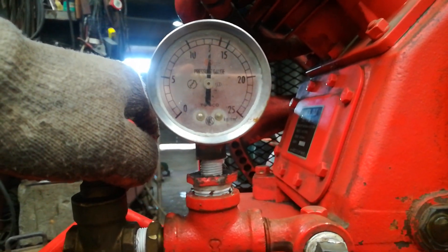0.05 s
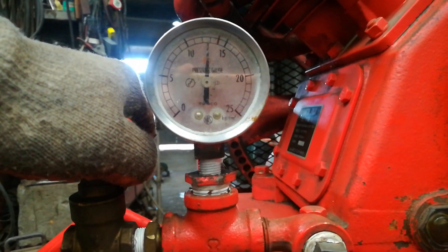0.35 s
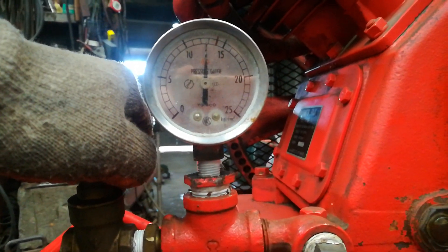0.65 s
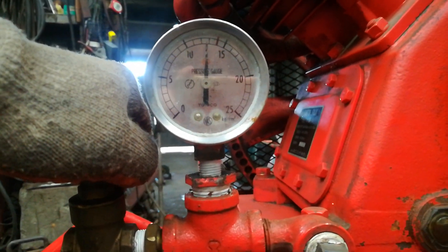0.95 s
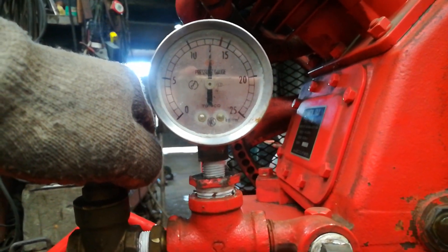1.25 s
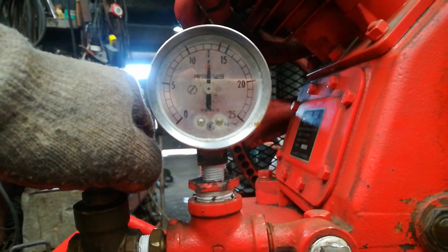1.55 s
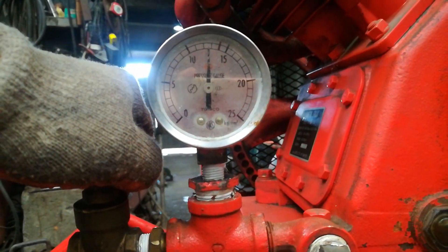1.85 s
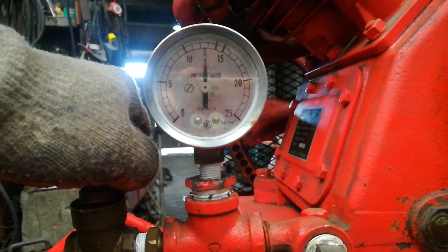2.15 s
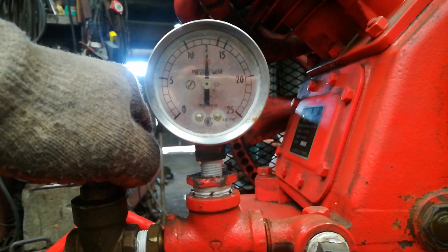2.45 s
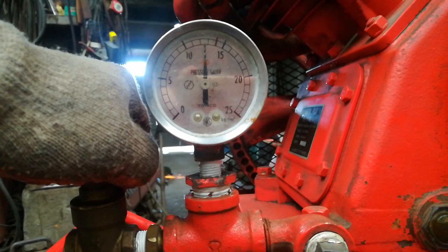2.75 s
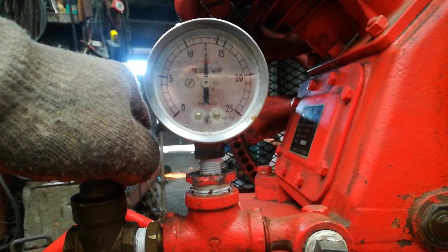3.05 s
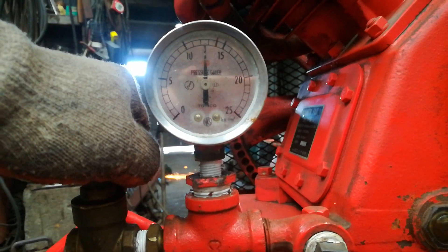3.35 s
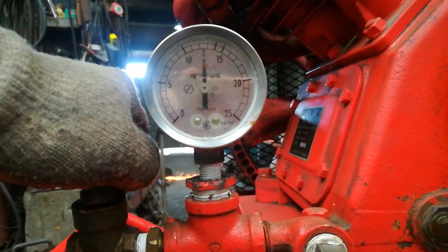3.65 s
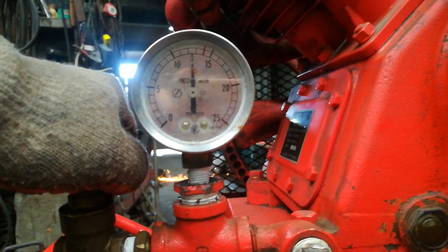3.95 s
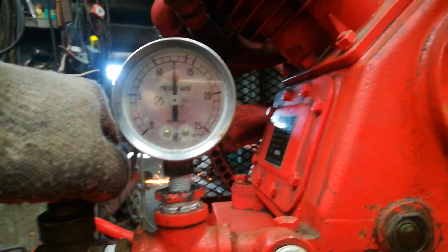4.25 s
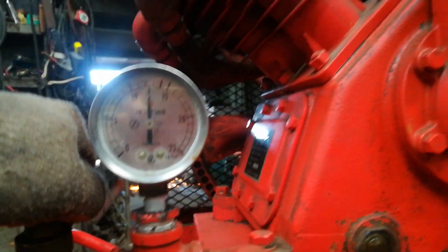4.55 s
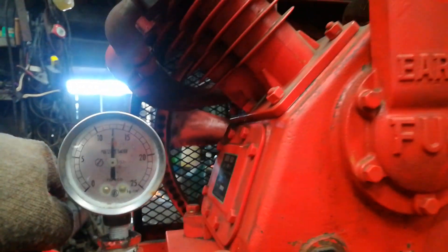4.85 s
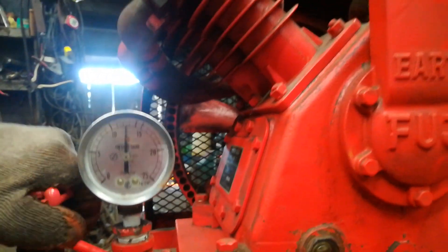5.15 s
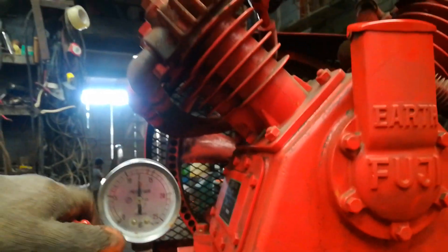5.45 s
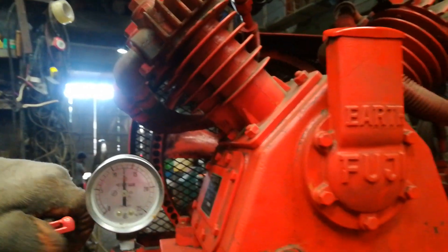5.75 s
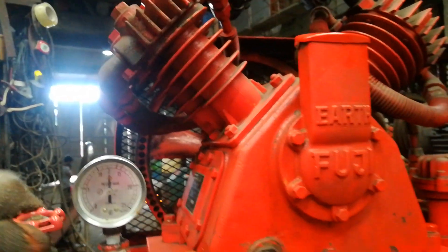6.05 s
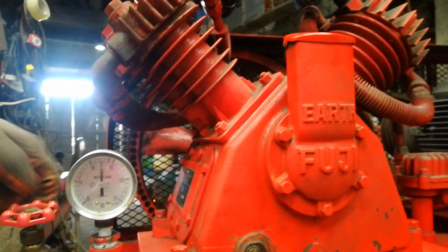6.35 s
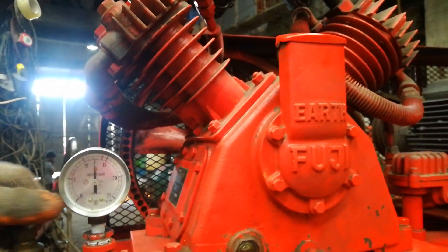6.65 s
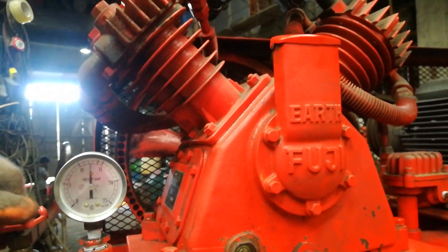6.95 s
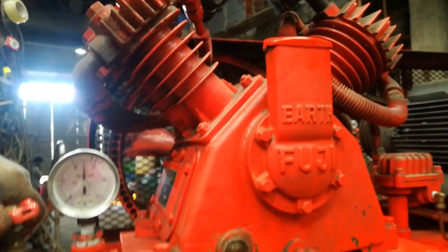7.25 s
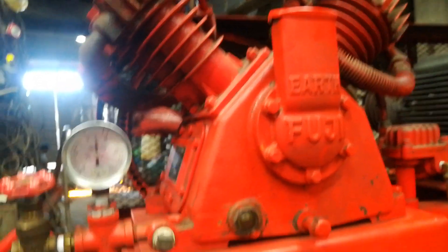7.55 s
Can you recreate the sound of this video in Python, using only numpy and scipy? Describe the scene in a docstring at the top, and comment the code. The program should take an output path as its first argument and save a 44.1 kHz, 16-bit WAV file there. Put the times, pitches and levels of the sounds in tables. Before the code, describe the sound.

Compressed air hisses loudly from a valve, buffeting the microphone with a low roar, then thins and is shut off over a faint workshop drone.

```python
"""Air hisses from the drain valve of a workshop compressor, held open by a gloved hand.
Close up, the jet overloads the stereo microphone: one-sided pops crowd into a low roar, then thin out
as the microphone backs away. The hand throttles the valve and screws it shut.
A last seep of air fades and leaves the drone of machines further off in the workshop."""
import sys
import numpy as np
from scipy import signal
from scipy.fft import rfft, irfft, next_fast_len
from scipy.io import wavfile
from scipy.ndimage import map_coordinates

SR = 44100
rng = np.random.default_rng(int(sys.argv[2]) if len(sys.argv) > 2 else 0)


def generate_wav(sig):
    """Save sig (samples, or channels by samples) to the path in sys.argv[1] as 16-bit PCM at SR."""
    pcm = np.round(np.clip(np.atleast_2d(sig).T, -1, 1) * 32767).astype(np.int16)
    wavfile.write(sys.argv[1], SR, pcm)


N = 344419
TIME_S = np.arange(N) / SR
SHUT_S, SHUT_TAKES_S = 6.55, 0.12  # the last turn seats the valve

# The hand throttles the valve in two turns: time_s, opening (1 wide, 0 a slit)
VALVE_OPENING = [(5.63, 1), (5.68, 0.21), (5.8, 0.04), (6.03, .05), (6.13, 0)]
# The microphone backs away from the valve: time_s, distance (0 close, 1 far)
MIC_DISTANCE = [(3.9, 0), (4.4, 0.17), (5.03, 0.56), (5.2, 0.89), (6.0, 1), (6.6, 0.76)]
# Brief dips and swells of the throttled hiss: peak_s, half_length_s, gain_db
HISS_SWELLS = [(5.9, 0.048, 0.5), (6.125, .025, -2), (6.26, 0.013, -1.5), (6.5, 0.055, 1)]
def jet(drain_db_per_s=0.25):
    """Escaping air changes colour with distance and throttling, and weakens as the tank empties."""
    opening, = curves(VALVE_OPENING)
    distance, = curves(MIC_DISTANCE)
    depth_db = 0.38 + 0.29 * distance + 0.26 * (1 - opening)
    swells_db = sum(db * swell(s, half, half) for s, half, db in HISS_SWELLS)
    flutter_db = depth_db * (wobble(14) + wobble(60)) + swells_db
    wide = np.sqrt(1 - distance) * close_jet(flutter_db) + np.sqrt(distance) * far_jet(flutter_db)
    air = np.sqrt(opening) * wide + np.sqrt(1 - opening) * throttled_jet(flutter_db)
    pressure = amp(-drain_db_per_s * TIME_S)
    return casting_echoes(air, distance) * pressure * fade(SHUT_S, SHUT_TAKES_S) ** 2


# The open jet, microphone close to the valve: freq_hz, left_db, right_db
CLOSE_SPECTRUM = [(200, -39.5, -45), (1000, -22.5, -20), (2200, -14, -17.5), (2890, -10, -13),
                  (4020, -4.5, -10), (5300, -1.5, -8.5), (5820, 0.15, -7.5), (7000, -3.5, -8),
                  (8100, -8, -11), (10000, -8, -8.5), (11100, -9, -7.5), (12980, -5, 2), (15800, -8.5, -5)]
# Peaks and notches of the outlet pipe and nearby castings: centre_hz, width_hz, left_db, right_db
CLOSE_RESONANCES = [(4048, 73, 0.5, -7), (4415, 56, -5, 2.5), (4506, 42, 6.5, 0.5), (4870, 50, -0.5, -3),
                    (5017, 65, 6.5, -3), (5320, 58, -1.5, -2.5), (5390, 90, 3, -4.5), (5580, 61, 3.5, 2),
                    (6300, 160, 0, -3), (6440, 50, -8.5, -6), (7494, 160, 0, -0.7), (12150, 160, -1, 2),
                    (12700, 280, -4.5, -8), (14083, 160, 1.5, 2.5), (14772, 99, 0, 11),
                    (15246, 90, 1.5, -3)]
def close_jet(flutter_db):
    """The wide-open valve at close range: a bright hiss coloured by the pipe."""
    air = turbulence(CLOSE_SPECTRUM, CLOSE_RESONANCES, shared=0.39, lag_ms=0.2023)
    return balance(air, hiss_db=-13 + flutter_db, hiss_pan_db=6, sizzle_db=-10.5, sizzle_pan_db=-3.5)


# The open jet, microphone further back: freq_hz, left_db, right_db
FAR_SPECTRUM = [(200, -41, -36.5), (1000, -19.5, -29.5), (2200, -18.5, -17.8), (3080, -12, -18),
                (4200, -7.5, -13), (5050, 2, -13.5), (6300, -4, -12.5), (7500, -2.5, -11),
                (9000, -14, -10.5), (10600, -12.5, -9.5), (11700, -9.5, -5), (12700, -13, -6),
                (14200, -10.4, -5.0), (15650, -12, -8)]
def far_jet(flutter_db):
    """The same air from further back: softer, without the pipe's narrow peaks."""
    air = turbulence(FAR_SPECTRUM, [], shared=0.35, lag_ms=0.199)
    return balance(air, hiss_db=-14.5 + flutter_db, hiss_pan_db=7, sizzle_db=-14, sizzle_pan_db=-4)


# The nearly shut valve, microphone well back: freq_hz, left_db, right_db
THROTTLED_SPECTRUM = [(150, -36, -34), (450, -33.5, -38.5), (1110, -18, -30), (1600, -28, -21),
                      (2200, -19, -23.5), (3200, -18, -15), (4200, -6, -14), (5200, 0, -12.5),
                      (6400, -7, -16), (7300, -7, -18.7), (8000, -20, -19.5), (10000, -18, -13),
                      (13000, -20, -6), (15500, -17.5, -6.5)]
# Its pipe and casting peaks and notches: centre_hz, width_hz, left_db, right_db
THROTTLED_RESONANCES = [(3300, 90, 5.5, -10), (3770, 50, -3.3, -5), (4100, 43, -7, 3.9),
                        (5125, 41, 9.5, -4), (5300, 90, 0.5, -6), (5760, 77, 8, 2), (6589, 90, -6, 0),
                        (7623, 90, -2, 2)]
def throttled_jet(flutter_db):
    """Air squeezed through a slit makes a thinner, quieter hiss."""
    air = turbulence(THROTTLED_SPECTRUM, THROTTLED_RESONANCES, shared=0.56, lag_ms=0.2)
    return balance(air, hiss_db=-20.5 + flutter_db, hiss_pan_db=10.7, sizzle_db=-28.5, sizzle_pan_db=-3)


def turbulence(spectrum, resonances, shared, lag_ms):
    """Jet noise shaped by the outlet; it reaches the microphone's left port first."""
    def response(hz):
        ripple_db = sum(np.array([[left], [right]]) * np.exp(-((hz - centre) / width) ** 2)
                        for centre, width, left, right in resonances)
        return amp(along(spectrum, hz) + ripple_db) * lagged(hz, lag_ms)
    return unit(filtered(noise_pair(shared), response))


def balance(air, hiss_db, hiss_pan_db, sizzle_db, sizzle_pan_db, split_hz=8760):
    """Sets level and pan for the hiss below the split and the sizzle above it."""
    hiss = filtered(air, lambda hz: 1 / (1 + (hz / split_hz) ** 20))
    return placed(hiss, hiss_db, hiss_pan_db) + placed(air - hiss, sizzle_db, sizzle_pan_db)


# Reflections from the castings to the microphone: close_delay_ms, far_delay_ms, left_db, right_db
CASTING_REFLECTIONS = [(.8, 0.59, -40.5, -34.5), (1.72, 1.3, -40, -22), (2.15, 1.8, -25.5, -27),
                       (3.7, 3.4, -19, -19.5), (5.4, 5.2, -18, -20.5)]
def casting_echoes(air, distance):
    """Echoes off the machine comb the hiss; the combs slide as the microphone moves."""
    heard = air.copy()
    for close_ms, far_ms, left_db, right_db in CASTING_REFLECTIONS:
        delay_ms = close_ms + (far_ms - close_ms) * distance
        earlier = np.arange(N) - delay_ms * SR / 1000
        echo = [map_coordinates(port, [earlier], order=2) for port in air]
        heard += amp([[left_db], [right_db]]) * echo
    return heard


# The roar of the microphone standing in the jet: freq_hz, level_db
ROAR_SPECTRUM = [(15, -10.5), (40, -3), (120, -0.5), (250, .5), (400, -0.45), (700, -1), (1000, -2.5),
                 (1500, -5), (2200, -8), (4000, -32), (9000, -71.5)]
def overload_roar(full_db=-23.5, full_pops_per_s=2580, edge_share=0.12, right_cut_hz=310):
    """Random downward pops merge into a low roar; their rate and loudness follow the overload."""
    overload = edge_share + (1 - edge_share) * fade(5.04, 0.21)  # out to the edge of the jet
    overload *= fade(5.48, 0.18)  # then clear of it
    chance = np.clip(full_pops_per_s * overload, 1, SR) / SR
    sizes = amp(2.5 * rng.standard_normal(N) + 1.77 * rng.standard_normal((2, N)))
    hits = (rng.random(N) < chance) * sizes
    kicks = (chance * sizes.mean() - hits) / np.sqrt(chance)  # steady pressure is not picked up
    def response(hz):
        dull_right = 1 + 1j * hz * np.array([[0], [1 / right_cut_hz]])
        return amp(along(ROAR_SPECTRUM, hz)) * lagged(hz, lag_ms=0.52) / dull_right
    filter_rms = np.sqrt(np.mean(np.abs(response(np.fft.rfftfreq(N, 1 / SR))) ** 2))
    level = overload * amp(full_db - 0.07 * wobble(13))
    return filtered(kicks * level, response) / filter_rms


# Single loud pops as the microphone leaves the jet: start_s, level_db
EDGE_POPS = [(5.152, -14.5), (5.206, -23), (5.325, -23), (5.345, -25), (5.391, -19.5), (5.44, -27),
             (5.493, -27), (5.524, -15), (5.5555, -28)]
def overload_pops(snap_s=0.00028, sag_s=0.0011, sag_gain=0.52, right_snap_gain=0.17, low_cut_hz=22):
    """Each pop is a sharp dip and a slower recovery, duller at the right port."""
    t = np.arange(SR // 20) / SR
    dip = lambda life_s: -t / life_s * np.exp(1 - t / life_s)
    shape = np.array([[1], [right_snap_gain]]) * dip(snap_s) + sag_gain * dip(sag_s)
    kicks = np.zeros(N)
    for start_s, level_db in EDGE_POPS:
        kicks[round(start_s * SR)] = amp(level_db)
    pops = signal.fftconvolve(kicks[None], shape, axes=1)[:, :N]
    return filtered(pops, lambda hz: 1j * hz / (low_cut_hz + 1j * hz) * lagged(hz, lag_ms=0.6))


# Hiss at the valve seat, left of the microphone: freq_hz, left_db, right_db
SEEP_HISS_SPECTRUM = [(1500, -25, -24), (3000, -1.5, -10), (4200, -4, -16), (5100, 4.5, -10),
                      (6000, -5, -14.5), (7500, -13, -15), (10000, -27.5, -26), (15000, -45, -46.5)]
# Its high sizzle, to the right: freq_hz, left_db, right_db
SEEP_SIZZLE_SPECTRUM = [(5010, -35, -35), (8500, -9, -8), (10500, -9, 2), (12500, -12, 2.5),
                        (15500, -17.5, -2)]
def seep(hiss_db=-45.5, sizzle_db=-53, wisp_db=-62, decay_db_per_s=32, seal_s=6.97):
    """A thin leak dies away until the seat is pressed tight; one more wisp as the hand lets go."""
    seated = 1 - fade(SHUT_S, SHUT_TAKES_S)
    age_s = np.maximum(TIME_S - SHUT_S, 0)
    leak = seated * amp(-decay_db_per_s * age_s) * fade(seal_s, 0.07)
    wisp = amp(wisp_db) * swell(peak_s=7.35, rise_s=0.14, fall_s=0.065)
    hiss = amp(hiss_db) * leak * rush(SEEP_HISS_SPECTRUM, shared=0.1)
    sizzle = (amp(sizzle_db) * leak + wisp) * rush(SEEP_SIZZLE_SPECTRUM, shared=0.1)
    return hiss + sizzle


# Drone and rumble of machines across the workshop: freq_hz, level_db
DRONE_SPECTRUM = [(100, -17), (200, -11), (420, -10.5), (650, -7.5), (900, -0.5), (1050, -1.5), (1190, 0),
                  (1380, -9), (2100, -9), (2500, -6.5), (3000, -7.5), (4700, -7.5), (8000, -18),
                  (15500, -22)]
RUMBLE_SPECTRUM = [(15, -12), (45, -5.5), (78, 0.5), (130, -8.5), (250, -14.5), (700, -50.5)]
# Narrow resonances, with levels relative to the drone: centre_hz, width_hz, level_db
DRONE_RESONANCES = [(171.6, 14, -16.5), (287.3, 12, -9.5), (852, 40, -17), (946, 25, -16.5), (1192, 41, -7),
                    (2330, 22, -15), (2565, 80, -13), (3420, 40, -16.5)]
# Drone and rumble at the microphone hold, then sink: time_s, level_db
DRONE_FADE = [(6.82, -49.5), (7.14, -59)]
RUMBLE_FADE = [(6.95, -55.5), (7.3, -68)]
def workshop(lean_db=0.8):
    """Distant machines drone, hum and rumble; the whole background sinks soon after the valve is shut."""
    def resonances(hz):
        response = 0
        for centre_hz, width_hz, level_db in DRONE_RESONANCES:
            detune = (hz - centre_hz) / width_hz
            peak = amp(level_db) * np.sqrt(SR / np.pi / width_hz)  # same power at any width
            response += peak / (1 + 2j * detune) / (1 + (detune / 3) ** 2)
        return response
    hum = filtered(noise_pair(shared=0.65), resonances)
    drone = (rush(DRONE_SPECTRUM, shared=0.11) + hum) * amp([[lean_db], [-lean_db]])
    rumble = rush(RUMBLE_SPECTRUM, shared=0.93)
    return amp(curves(DRONE_FADE)) * drone + amp(curves(RUMBLE_FADE)) * rumble


def amp(db):
    """Decibels to amplitude."""
    return 10 ** (np.asarray(db) / 20)


def unit(x):
    """Scaled to rms 1."""
    return x / np.sqrt(np.mean(x ** 2) + 1e-20)


def along(spectrum, hz):
    """Each column after the frequency, read on a log axis."""
    freqs, *columns = np.transpose(spectrum)
    return np.array([np.interp(np.log(hz + 1), np.log(freqs + 1), column) for column in columns])


def curves(rows):
    """One value per sample for each column after the time."""
    times, *columns = np.transpose(rows)
    return [np.interp(TIME_S, times, column) for column in columns]


def fade(start_s, length_s):
    """1 until the start, then straight down to 0."""
    return np.clip(1 - (TIME_S - start_s) / length_s, 0, 1)


def swell(peak_s, rise_s, fall_s):
    """A smooth bump of height 1."""
    t = TIME_S - peak_s
    return np.exp(-(t / np.where(t < 0, rise_s, fall_s)) ** 2)


def wobble(knots_per_s):
    """A smooth random curve."""
    knots = rng.standard_normal(int(N * knots_per_s / SR) + 4)
    return map_coordinates(knots, [TIME_S * knots_per_s])


def filtered(x, response):
    """x through a complex frequency response."""
    size = next_fast_len(N + SR // 4)
    return irfft(rfft(x, size) * response(np.fft.rfftfreq(size, 1 / SR)), size)[..., :N]


def lagged(hz, lag_ms):
    """Response of the two ports when the right one hears later."""
    return np.exp(-2j * np.pi * hz * np.array([[0], [lag_ms]]) / 1000)


def noise_pair(shared):
    """White noise at two ports, with a share of its power in common."""
    white = rng.standard_normal((3, N))
    return np.sqrt(shared) * white[0] + np.sqrt(1 - shared) * white[1:]


def rush(spectrum, shared):
    """Coloured stereo noise whose centre has rms 1."""
    pair = filtered(noise_pair(shared), lambda hz: amp(along(spectrum, hz)))
    return pair / pair.mean(axis=0).std()


def placed(pair, level_db, pan_db):
    """A noise pair set to a level, its left side pan_db above its right."""
    sides = unit(amp(np.array([[pan_db], [-pan_db]]) / 2))
    return pair / pair.std(axis=1, keepdims=True) * sides * amp(level_db)


def scene():
    """The valve and the overloaded microphone in front, the workshop behind."""
    return jet() + overload_roar() + overload_pops() + seep() + workshop()


def record(dry):
    """The tallest peaks clip at full scale; nothing is kept above the band limit."""
    top_hz, slope_width_hz = 15730, 100
    return filtered(np.clip(dry, -1, 1), lambda hz: np.clip((top_hz - hz) / slope_width_hz + 0.5, 0, 1))


dry = scene()
out = record(dry)
generate_wav(out)
```